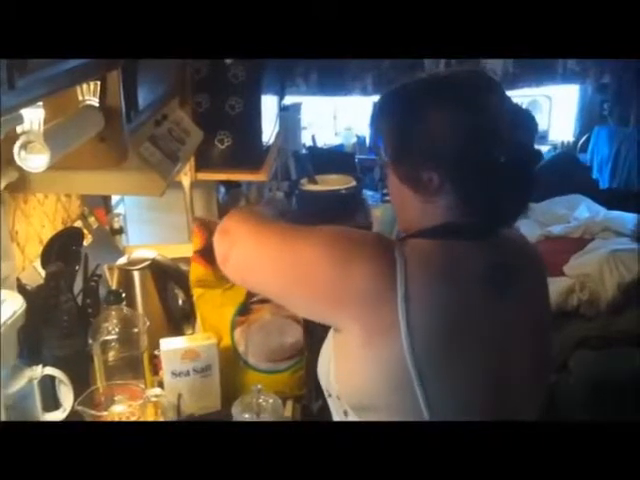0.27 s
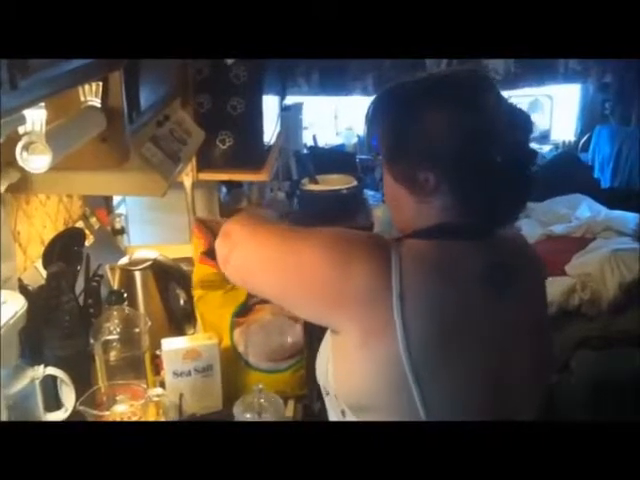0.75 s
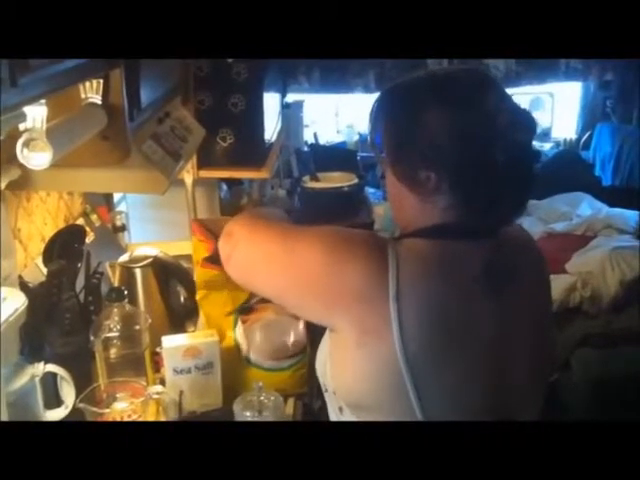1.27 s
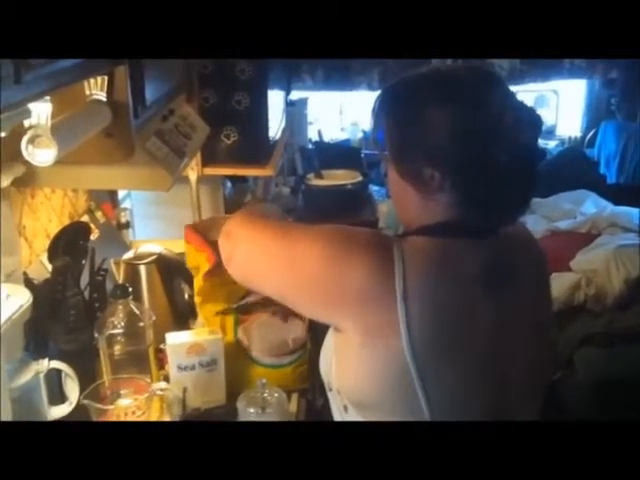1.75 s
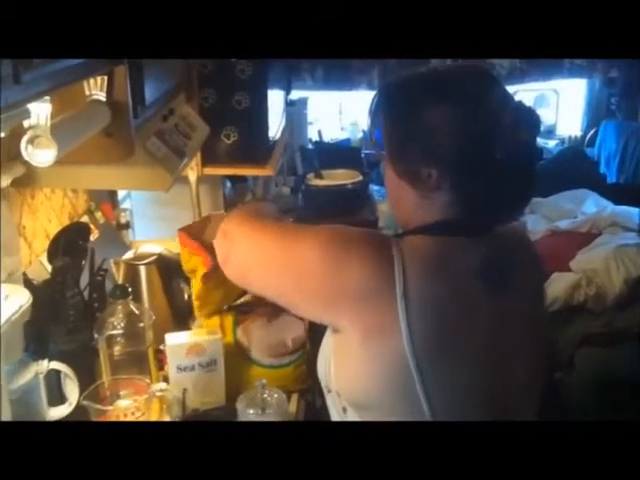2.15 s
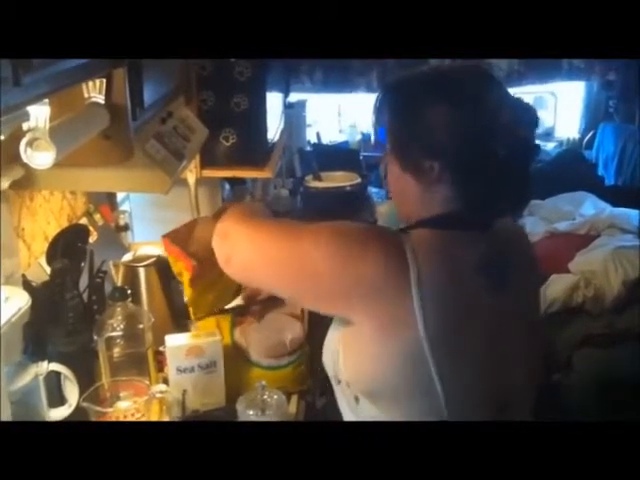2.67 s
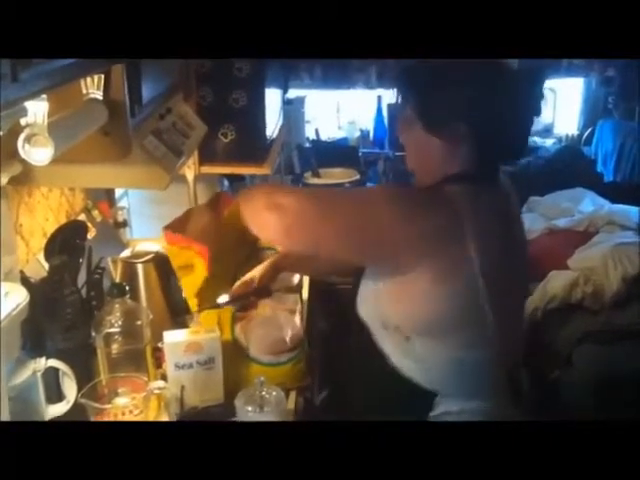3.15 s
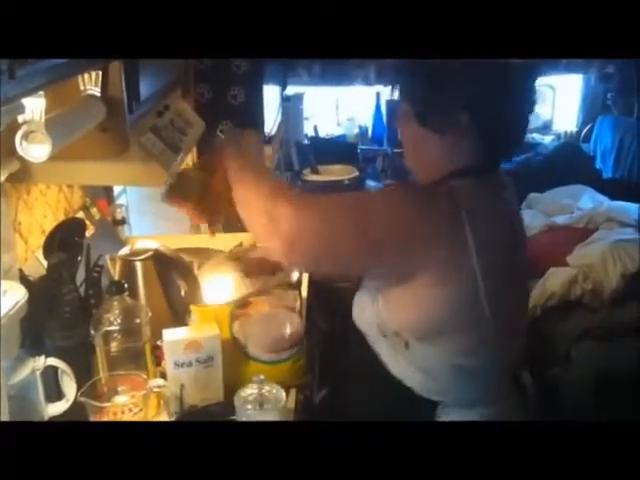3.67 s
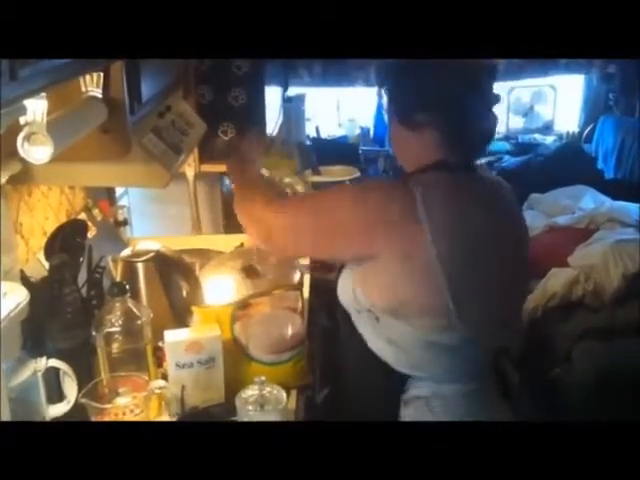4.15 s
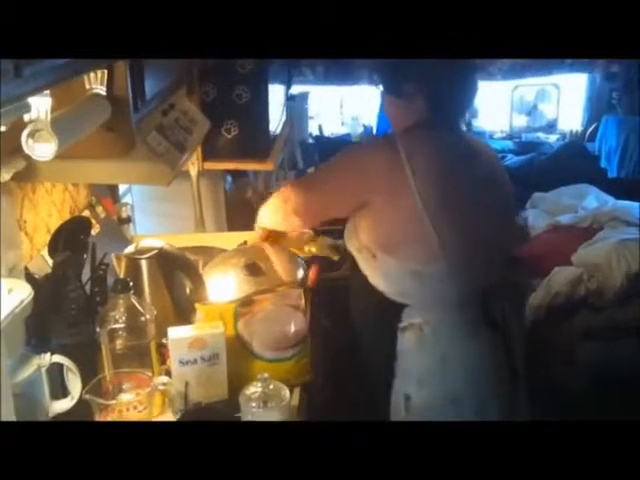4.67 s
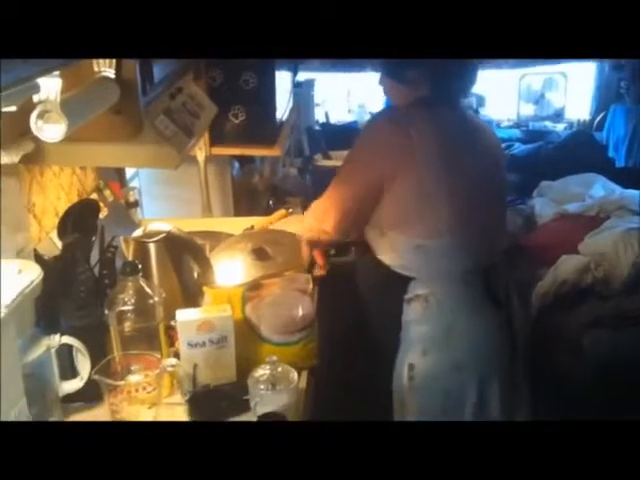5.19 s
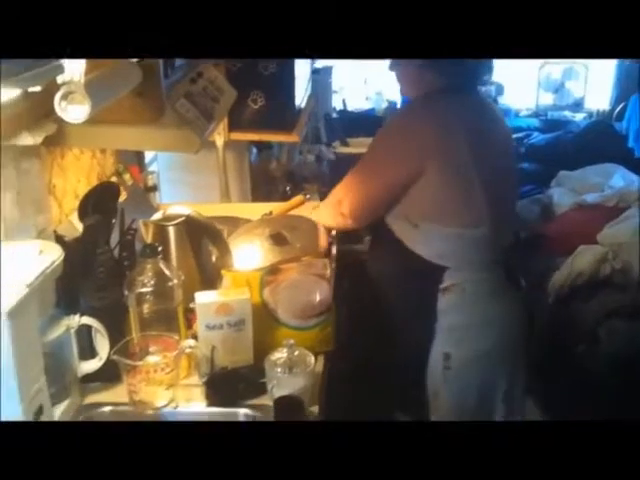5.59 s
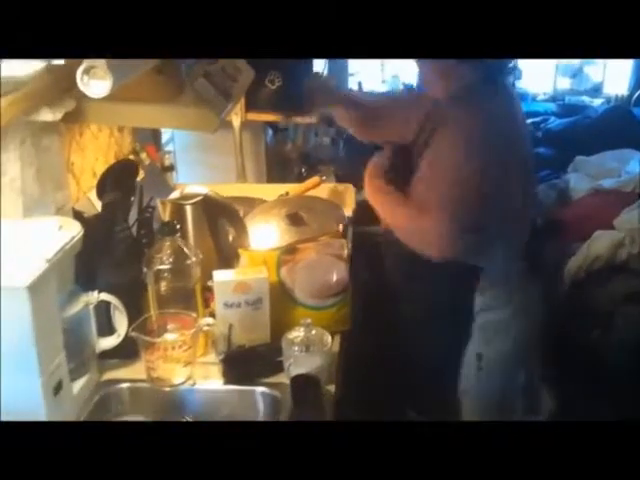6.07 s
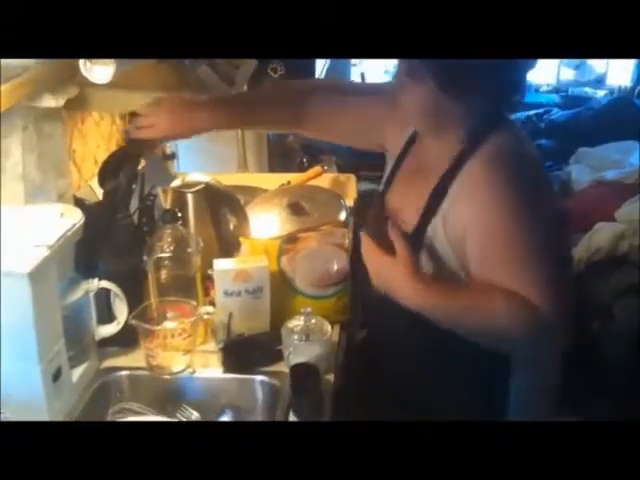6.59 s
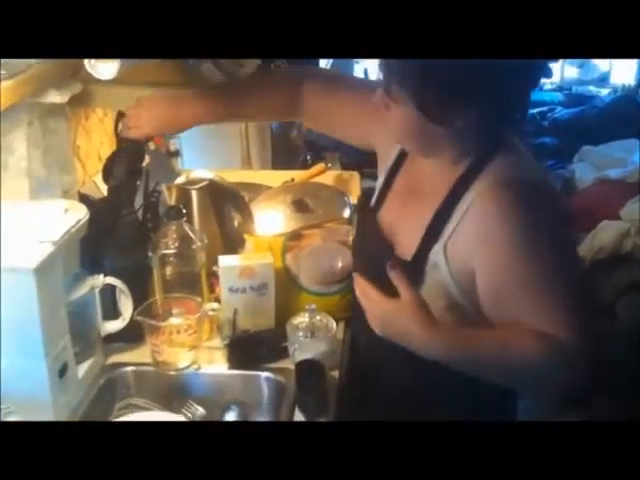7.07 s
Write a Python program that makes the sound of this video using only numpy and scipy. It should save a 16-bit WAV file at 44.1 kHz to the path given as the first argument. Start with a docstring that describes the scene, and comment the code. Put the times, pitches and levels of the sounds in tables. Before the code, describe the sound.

In a small kitchen, a stiff paper flour bag is shaken and handled close by, crackling in irregular bursts with sharp snaps and soft low slumps of flour. The handling grows busier, peaks in a loud papery slap midway, then thins to light folding rustles. Finally several things are set down on a wooden shelf with hollow thuds and clacks. A short, dense room tail and faint steady hiss surround everything.

```python
"""Paper bag of flour in a small kitchen

A stiff bag is shaken, scooped from, slapped down and folded: dense tiny buckles and panel pops are
filtered as paper and gated by movements; single snaps and low flour slumps are decaying noise bursts.
Later things are set down on a wooden shelf: a ringing thud plus contact noise that excites wood modes.
A dense, changing room tail follows these sounds; steady hiss and a faint wavering hum lie below.
"""
import sys
import numpy as np
from scipy import signal
from scipy.fft import rfft, irfft
from scipy.io import wavfile

SR = 44100
rng = np.random.default_rng(int(sys.argv[2]) if len(sys.argv) > 2 else 0)


def generate_wav(signal):
    """Clip the signal to [-1, 1] and save it as 16-bit WAV at the path in sys.argv[1]."""
    frames = np.transpose(np.atleast_2d(signal))
    scaled = np.clip(frames, -1, 1) * 32767
    pcm = np.round(scaled).astype(np.int16)
    wavfile.write(sys.argv[1], SR, pcm)


N = 323253

# hiss spectrum, relative: (frequency [Hz], density [dB per Hz])
HISS_SPECTRUM = [(25, 2.5), (55, -20), (160, -1.5), (330, -0.5), (1000, -4.5), (1600, -3.5), (2500, -9.5),
                 (4000, -7), (7000, -12), (13000, -12.5), (15700, -13)]
# hum tones: (frequency [Hz], mean level [dB rms])
HUM_TONES = [(360.5, -78)]
# broad humps and dips from the nearby counter and wall, on paper and knocks:
# (centre [Hz], width [Hz], gain [dB])
COUNTER_HUMPS = [(210, 80, 3), (570, 150, 4), (1070, 200, 3), (1870, 200, 3), (2750, 500, -4),
                 (4200, 800, 3), (6100, 600, 3), (7500, 800, -3), (10400, 900, 3), (11600, 800, -3),
                 (13300, 1300, 5)]
# things set down on wood: (time [s], level [dB], thud pitch [Hz], clack centre [Hz],
# clack re level [dB], crack re level [dB])
SHELF_KNOCKS = [(4.135, -51.5, 225, 1420, -25, -25), (4.222, -43.5, 276, 790, -4.5, -30),
                (4.236, -45.5, 226, 1000, -10, -26), (5.301, -40, 617, 1440, -2, -16),
                (5.867, -48, 603, 1240, 9, -9), (6.332, -37, 298, 1310, -11, -33),
                (6.43, -53.5, 202, 1610, 1, -2.5), (6.482, -44, 277, 1240, -18, -14),
                (6.725, -29.5, 265, 1500, -1, -8), (6.742, -39.5, 254, 1810, -12, -27),
                (6.81, -57.5, 700, 1040, 7, -0.5), (7.004, -67.5, 443, 2070, 11.5, 9),
                (7.212, -33.5, 387, 1390, 3.5, -15.5), (7.288, -36.5, 524, 1790, 7, -14.5)]
# modes of the wooden shelf: (frequency [Hz], relative level [dB], t60 [s])
WOOD_MODES = [(430, -17, 0.12), (515, 3, 0.09), (980, 4.5, 0.063), (1183, 3.5, 0.059), (1458, -13, 0.088),
              (1608, 9.5, 0.037), (1790, 4.5, 0.019), (1910, -7, .04)]
# paper spectrum, relative: (frequency [Hz], density [dB per Hz])
PAPER_SPECTRUM = [(24, -55), (40, -44.5), (166, -5.5), (474, -10.5), (537, 1), (821, -7.5), (1080, -1.5),
                  (1870, -3), (2650, -8.5), (4160, -6), (7200, -12), (13100, -13), (15600, -23.5)]
# movements of the bag: (start [s], length [s], level [dB], swell over the length [dB],
# flour thump re level [dB], bag hollow re level [dB], crispness re level [dB])
BAG_MOVES = [(0.0, 0.086, -45.5, -11.5, -3, 1.5, -1), (.16, 0.05, -48.5, 2, -7, -16, -6.5),
             (.255, 0.032, -49.5, 0, -8, -1.5, -6.5), (0.336, 0.013, -54.5, 0, 5, -22, -1.5),
             (.48, 0.088, -67, 9.5, -6, -3.5, 1), (.59, 0.21, -53.5, 8.5, -14, -5, 1),
             (.86, 0.047, -49.5, -0.5, -9, -2.5, 0.5), (0.948, 0.11, -53, 6, -10, -5.5, 0),
             (1.095, 0.088, -43.5, 1.5, -9, 4, -3), (1.23, 0.046, -51, -0.5, -2.5, 2.5, -10),
             (1.329, 0.2, -45.5, -5, -10.5, -1.5, -1.5), (1.575, 0.082, -39.5, -2, -14.5, -3, -2.5),
             (1.69, 0.073, -49, 6, -7.5, -1, -13), (1.838, .15, -38.5, -3, -14.5, -7, -2.5),
             (2.01, 0.13, -40.5, -7, -14, -4, 1.5), (2.249, .11, -41, -6, -6.5, -5, -2.5),
             (2.385, 0.089, -42, -1, -8, -1.5, -1.5), (2.56, 0.067, -68, 10, -11.5, 1.5, -3),
             (2.659, .17, -48, -2.5, -11.5, -1, -1.5), (2.86, 0.094, -50.5, 2.5, -8.5, -3.5, -0.5),
             (2.99, 0.15, -59.5, 5.5, -7.5, 2, -5), (3.1, 0.12, -48.5, 7.5, -13.5, -4.5, -0.5),
             (3.31, 0.018, -46.5, 2, -14.5, -9, -2), (3.392, 0.13, -44.5, -6, -6, -4, -1),
             (3.52, 0.047, -26.5, -16, -22, -3, -8), (3.621, 0.026, -46.5, 3.5, -12.5, -3, -1.5),
             (3.73, 0.12, -61, -4, -12, -7, -10), (3.875, .05, -62.5, -1.5, -19, -18, -0.5),
             (4.068, 0.016, -59, -4.5, -18, -3.5, -2), (4.45, .14, -70.5, 1, -13, -11, -4),
             (4.61, .11, -67.5, 3.5, -5, -12, 4.5), (4.75, .07, -63.5, -7, -5, -5, -0.5),
             (4.846, 0.034, -42.5, -7, -11, -10, -9), (4.905, 0.05, -53.5, 0, 1, -8, -1.5),
             (5.015, 0.1, -54, -6.5, -9, -9, 2), (5.16, 0.076, -58.5, 9.5, -4, -13, -2),
             (5.31, 0.12, -62, -5, -8, -16, 2), (5.5, 0.068, -61.5, 1.5, -11, -4.5, -1.5),
             (5.605, 0.13, -52.5, -0.5, -10.5, -7, 0.5), (5.81, 0.032, -57.5, -2, -26, -20, -6),
             (6.36, 0.2, -75, 5.5, 3, -2, 1.5)]
# single snaps of the paper: (time [s], level [dB], hollow re level [dB], crispness re level [dB])
PAPER_SNAPS = [(0.031, -24, -25, -8), (0.148, -36, -25, -7), (0.165, -32, -22, -9), (0.187, -38.5, -28, -2),
               (0.224, -39.5, -11, -2), (0.337, -33.5, -22, -32), (0.457, -44.5, -25, -9),
               (0.835, -37.5, -18, -18), (0.896, -38, -27, 8), (0.954, -33, -25, -12.5),
               (1.071, -35, -3, -10), (1.11, -34.5, -15, 7), (1.648, -26.5, -24, -18),
               (1.706, -31, -14, -15), (1.733, -29.5, -4, -14), (1.858, -33, 1, 0), (1.897, -29.5, -2, -3),
               (2.007, -33.5, -12, -10), (2.053, -24.5, -3.5, 0.5), (2.112, -31, -7, -18),
               (2.399, -36.5, -8, 6.5), (2.422, -38.5, -11, 6), (2.438, -29, -21, 3.5),
               (2.645, -34, -3.5, -1.5), (3.115, -35, -31, 0), (3.325, -38, -6, 2), (3.388, -41, -29, -3.5),
               (3.5, -20.5, 1.5, 5), (3.628, -41.5, 6.5, 4), (3.87, -45.5, -10, -10), (4.062, -46, -33, -3),
               (4.702, -58, -16, -13), (4.836, -32.5, -3.5, -12.5), (5.004, -35.5, -1.5, -11),
               (5.222, -37.5, -17, -11), (5.603, -54, -13, -8), (5.664, -39, 5, -7),
               (5.751, -41.5, -17, -10)]
# soft low puffs of flour slumping in the bag: (time [s], level [dB])
FLOUR_SLUMPS = [(.335, -53.5), (0.897, -44), (1.565, -43), (1.86, -42), (2.11, -40), (3.144, -38.5),
                (3.499, -33.5), (3.87, -61), (4.469, -60), (4.7, -66), (4.879, -47), (4.914, -49),
                (5.13, -51.5), (5.196, -44.5), (5.66, -51)]

HISS_DB, CUTOFF_HZ = -65, 15740
ROOM_T60_S, ROOM_RISE_S, ROOM_DB = 0.18, 0.0017, -5
MOVE_S = 0.15   # time for the hands to reach a place that the room answers differently
CONTACT_T60_S, CONTACT_RISE_S, PUSH_S = 0.065, 0.0028, 0.00064
THUD_T60_S, THUD_RISE_S = 0.028, 0.0037
WOOD_FALL_DB_PER_OCTAVE, CLATTER_DB = 12.0, -7
BUCKLES_PER_S, BUCKLE_SPREAD_DB, CLUMP_DB, CLUMP_HZ = 3000, -1, 2.5, 18.3
POPS_PER_S, POP_SPREAD_DB, POP_CYCLES, POP_DB = 500, 4.76, 30, -16
COLOUR_SHIFT_DB, COLOUR_SHIFT_HZ = 2.35, 10.8
RISE_DB_PER_S, FALL_DB_PER_S = 589, 335   # movements set in faster than they settle
SNAP_T60_S, SNAP_RISE_S, SNAP_THUMP_DB = 0.039, 0.003, -20.5
SLUMP_T60_S, SLUMP_RISE_S = 0.16, 0.0064


def from_db(db):
    """Decibels to amplitude gain."""
    return 10 ** (np.asarray(db) / 20)


def rms_one(x):
    """Scale to rms 1."""
    return x / np.sqrt(np.mean(x ** 2, axis=-1, keepdims=True) + 1e-20)


def bandpass(x, order, low_hz, high_hz):
    """Butterworth band-pass."""
    return signal.sosfilt(signal.butter(order, [low_hz, high_hz], "band", fs=SR, output="sos"), x)


def coloured(x, spectrum, humps=()):
    """Minimum-phase filter with the given spectrum and humps, built by folding the cepstrum."""
    hz = np.maximum(np.arange(2049) * SR / 4096, 1)
    points_hz, points_db = np.array(spectrum).T
    level_db = np.interp(np.log(hz), np.log(points_hz), points_db)
    for centre_hz, width_hz, hump_db in humps:
        level_db = level_db + hump_db / (1 + (2 * (hz - centre_hz) / width_hz) ** 2)
    cepstrum = irfft(np.log(from_db(level_db)))
    cepstrum[1:2048] *= 2
    cepstrum[2049:] = 0
    impulse_response = irfft(np.exp(rfft(cepstrum)))
    return signal.fftconvolve(x, impulse_response)[:len(x)]


def drift(corner_hz):
    """Slow random wander of rms 1: noise through a two-pole low-pass."""
    r = np.exp(-2 * np.pi * corner_hz / SR)
    noise = rng.standard_normal(N + 8000)
    return rms_one(signal.lfilter([1], [1, -2 * r, r * r], noise)[8000:])


def decay_at(time_s, t60_s, rise_s):
    """Slice and envelope: linear rise over an exponential decay, cut at -60 dB."""
    start = round(time_s * SR)
    t = np.arange(min(round(t60_s * SR), N - start)) / SR
    envelope = np.minimum(t / rise_s, 1) * from_db(-60 * t / t60_s)
    return slice(start, start + len(t)), envelope


def ring(x, hz, t60_s):
    """One mode as a two-pole resonator; a unit click starts a decaying sine of height 1."""
    r, w = from_db(-60 / (t60_s * SR)), 2 * np.pi * hz / SR
    return signal.lfilter([0, np.sin(w)], [1, -2 * r * np.cos(w), r * r], x)


def four_bands(x):
    """Thump, hollow, middle and crisp parts, each of rms 1."""
    cuts = [(400, "low"), ([400, 800], "band"), ([800, 3000], "band"), (3000, "high")]
    parts = [signal.sosfilt(signal.butter(3, hz, kind, fs=SR, output="sos"), x) for hz, kind in cuts]
    return rms_one(np.array(parts))


def background():
    """Nearly steady coloured noise plus faint sines of wavering level."""
    hiss_gain = from_db(HISS_DB + 0.5 * drift(0.33))
    out = hiss_gain * rms_one(coloured(rng.standard_normal(N + 4096), HISS_SPECTRUM)[4096:])
    t = np.arange(N) / SR
    for hz, level_db in HUM_TONES:
        amplitude = np.sqrt(2) * from_db(level_db + 1.8 * drift(8.2))
        out += amplitude * np.sin(2 * np.pi * hz * t)
    return out


def room(x, count=8):
    """Direct sound plus decaying noise tails, crossfaded in a cycle of places as the hands move."""
    t = np.arange(SR // 2) / SR
    tail_rise = np.minimum(t / ROOM_RISE_S, 1)
    place = np.arange(N) / SR / MOVE_S
    out = x.copy()
    for k, noise in enumerate(rng.standard_normal((count, len(t)))):
        tail = noise * from_db(-60 * t / ROOM_T60_S) * tail_rise
        away = np.abs((place - k + count / 2) % count - count / 2)
        here = np.cos(np.pi / 2 * np.minimum(away, 1))
        out += from_db(ROOM_DB) * signal.fftconvolve(x * here, tail / np.linalg.norm(tail))[:N]
    return out


def wood_ring(contact_noise, clack_hz):
    """Contact noise excites the shelf modes; the blow favours those near clack_hz."""
    wood = 0
    for hz, mode_db, t60_s in WOOD_MODES:
        favoured_db = mode_db - WOOD_FALL_DB_PER_OCTAVE * abs(np.log2(hz / clack_hz))
        wood = wood + from_db(favoured_db) * rms_one(ring(contact_noise, hz, t60_s))
    return wood / np.abs(wood).max()


def knocks():
    """A soft push rings the thud; rattling contact wakes the wood, clatters and cracks."""
    out, noise = np.zeros(N), rng.standard_normal(N)
    clatter = rms_one(bandpass(noise, 4, 330, 2100))
    crack = rms_one(bandpass(noise, 1, 3300, 5500))
    dull = signal.butter(6, 2100, fs=SR, output="sos")   # wood swallows the treble of its own ring
    for time_s, level_db, thud_hz, clack_hz, clack_db, crack_db in SHELF_KNOCKS:
        at = slice(round(time_s * SR), round((time_s + 0.3) * SR))
        t = np.arange(len(out[at])) / SR
        contact = np.minimum(t / CONTACT_RISE_S, 1) * from_db(-60 * t / CONTACT_T60_S)
        push = np.sin(np.pi * np.minimum(t / PUSH_S, 1)) / 12.0   # one half sine
        thud = np.minimum(t / THUD_RISE_S, 1) * ring(push, thud_hz, THUD_T60_S)
        wood = signal.sosfilt(dull, wood_ring(contact * noise[at], clack_hz))
        clack = wood + from_db(CLATTER_DB) * contact * clatter[at]
        knock = thud + from_db(clack_db) * clack + from_db(crack_db) * contact * crack[at]
        out[at] += from_db(level_db) * knock
    # weaker deep bass, and the same humps as the paper
    return coloured(out, [(40, -13), (150, 2.0), (16000, -1.0)], COUNTER_HUMPS)


def buckles():
    """Tiny clicks of random sign and uneven size, their level wandering in clumps."""
    size_db = BUCKLE_SPREAD_DB * np.minimum(rng.exponential(1, N), 3.5)
    sizes = from_db(size_db) * rng.choice([-1, 1], N)
    struck = rng.random(N) < BUCKLES_PER_S / SR
    return rms_one(sizes * struck * from_db(CLUMP_DB * drift(CLUMP_HZ)))


def pops():
    """Larger panels flip over and ring some cycles, each at one of 16 pitches."""
    sizes = from_db(POP_SPREAD_DB * np.minimum(rng.exponential(1, N), 4))
    sizes = sizes * (rng.random(N) < POPS_PER_S / SR)
    dealt = rng.integers(0, 16, N)
    out = np.zeros(N)
    for k, hz in enumerate(np.geomspace(300, 4500, 16)):
        clicks = sizes * (dealt == k) + 1e-18   # offset avoids denormals
        out += ring(clicks, hz, POP_CYCLES / hz) * np.sqrt(hz) * hz ** 0.18
    return rms_one(out)


def movements():
    """Band gains: each movement rises, swells and settles; overlapping ones add in power."""
    t, power = np.arange(N) / SR, np.zeros((4, N))
    for start_s, length_s, level_db, swell_db, thump_db, hollow_db, crisp_db in BAG_MOVES:
        shape_db = swell_db * np.clip((t - start_s) / length_s, 0, 1)
        shape_db -= RISE_DB_PER_S * np.maximum(start_s - t, 0)
        shape_db -= FALL_DB_PER_S * np.maximum(t - start_s - length_s, 0)
        band_gains = from_db([thump_db, hollow_db, 0, crisp_db])
        power += np.outer(band_gains, from_db(level_db + shape_db)) ** 2
    return np.sqrt(power)


def rustle():
    """Buckles and pops through the sheet, four bands gated by the movements."""
    sheet = coloured(buckles() + from_db(POP_DB) * pops(), PAPER_SPECTRUM, COUNTER_HUMPS)
    bands = four_bands(sheet)
    # the sheet changes shape, its colour shifts
    bands *= from_db([COLOUR_SHIFT_DB * drift(COLOUR_SHIFT_HZ) for _ in bands])
    return np.sum(bands * movements(), axis=0)


def snaps(burst):
    """Short noise bursts in the paper's colour, each with its own band balance."""
    out = np.zeros(N)
    for time_s, level_db, hollow_db, crisp_db in PAPER_SNAPS:
        at, envelope = decay_at(time_s, SNAP_T60_S, SNAP_RISE_S)
        balance = from_db([SNAP_THUMP_DB, hollow_db, 0, crisp_db])
        out[at] += from_db(level_db) * envelope * (balance @ burst[:, at])
    return out


def slumps(burst):
    """Flour slumps in the bag: longer decaying bursts of the thump band only."""
    out = np.zeros(N)
    for time_s, level_db in FLOUR_SLUMPS:
        at, envelope = decay_at(time_s, SLUMP_T60_S, SLUMP_RISE_S)
        out[at] += from_db(level_db) * envelope * burst[0, at]
    return out


def paper_bag():
    """Rustle, snaps and slumps, all coloured by the same sheet."""
    rustling = rustle()
    burst = four_bands(coloured(rng.standard_normal(N), PAPER_SPECTRUM, COUNTER_HUMPS))
    return rustling + snaps(burst) + slumps(burst)


def scene():
    """Bag and knocks in the room, over the background."""
    return (room(paper_bag() + knocks()) + background())[None]


def record(dry):
    """Steep elliptic low-pass at the top."""
    return signal.sosfilt(signal.ellip(14, 0.5, 70, CUTOFF_HZ, fs=SR, output="sos"), dry)


dry = scene()
out = record(dry)
generate_wav(out)
```